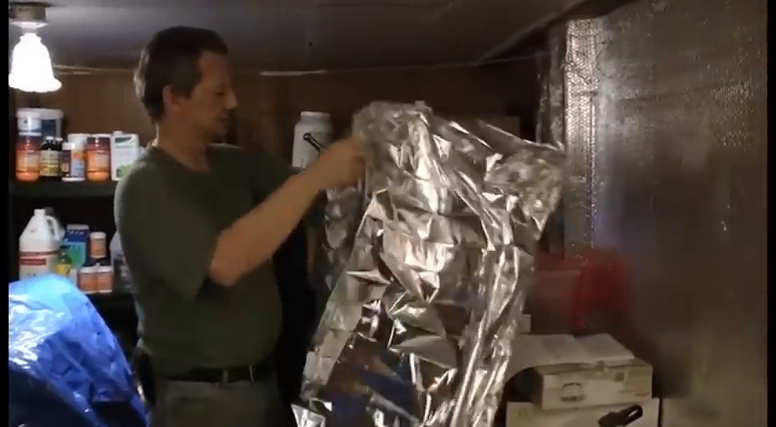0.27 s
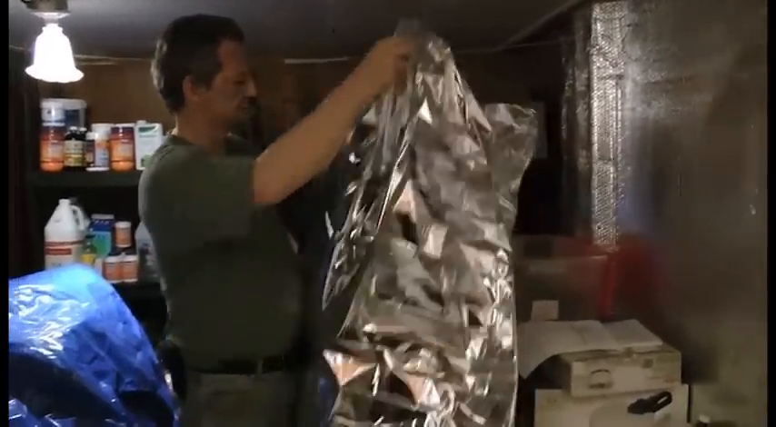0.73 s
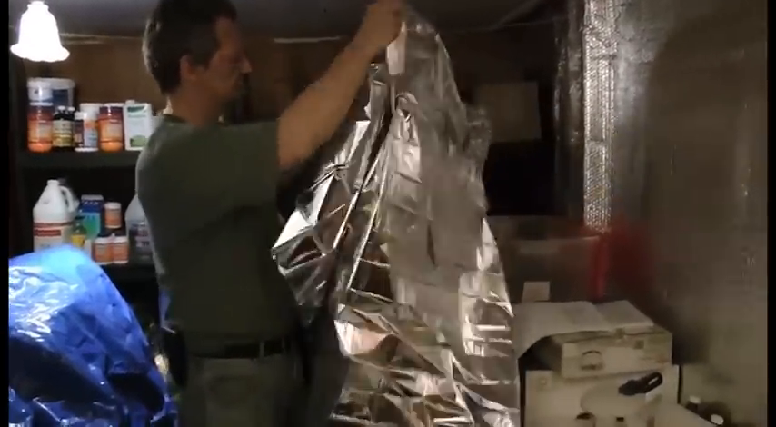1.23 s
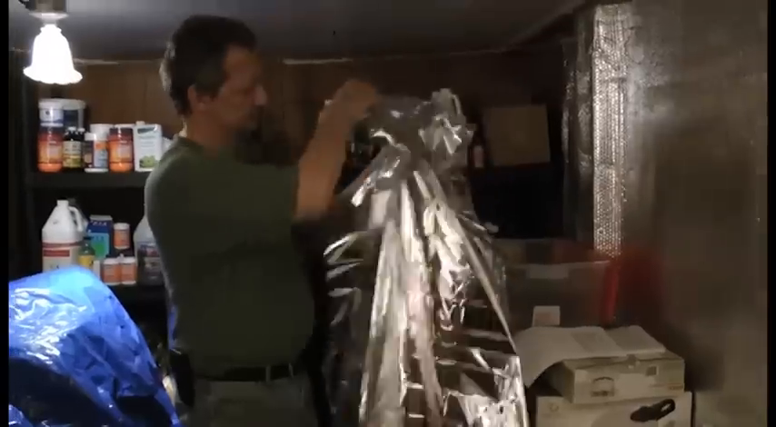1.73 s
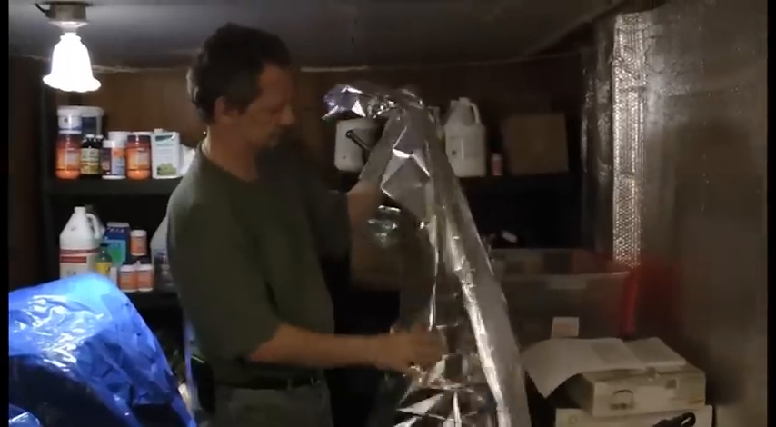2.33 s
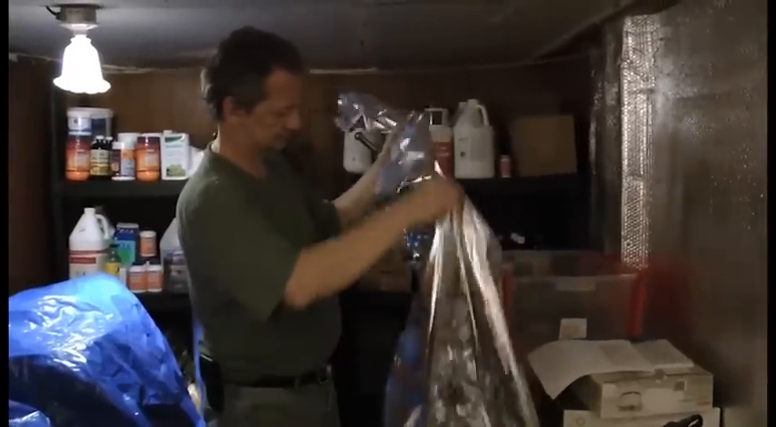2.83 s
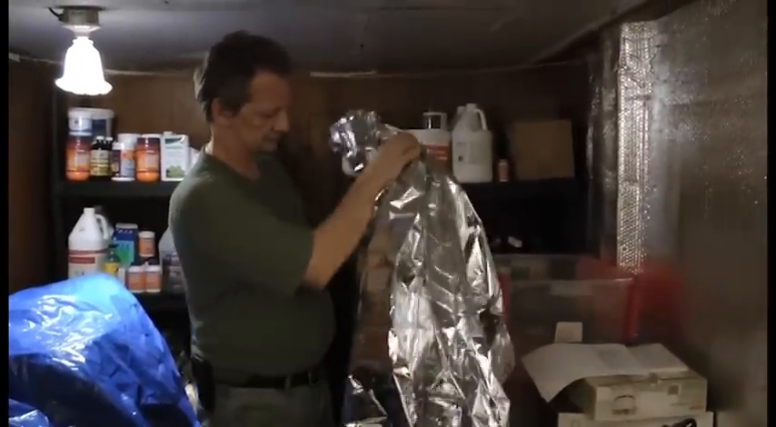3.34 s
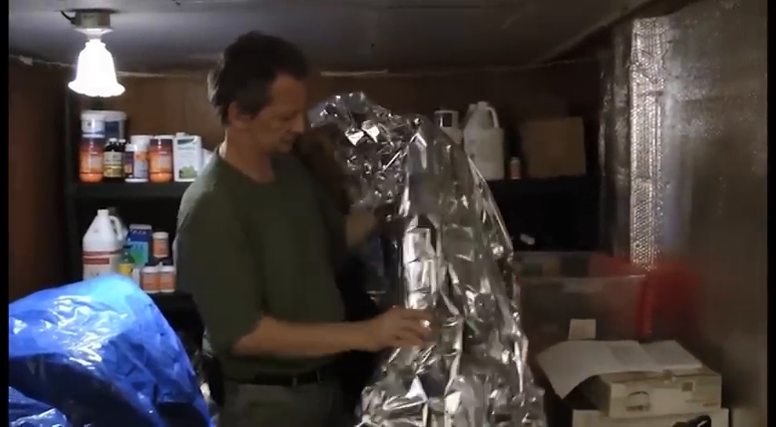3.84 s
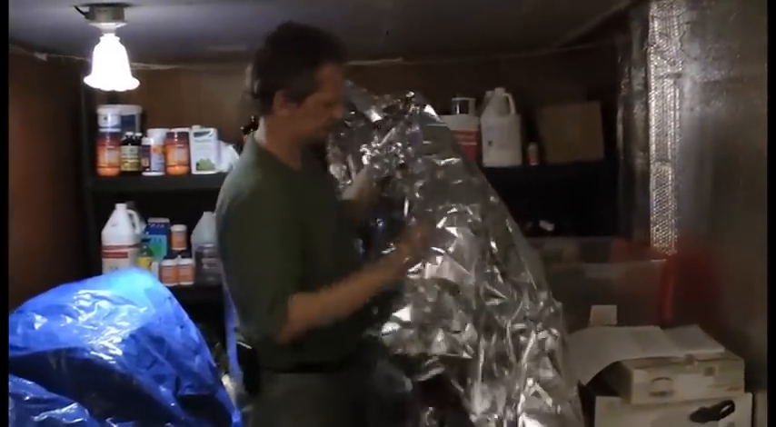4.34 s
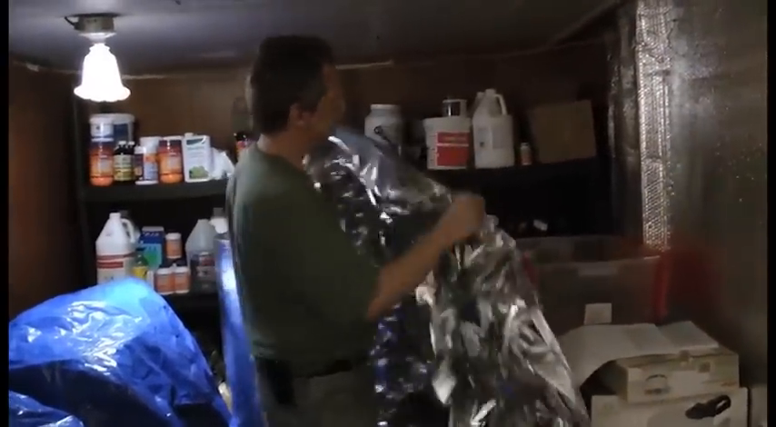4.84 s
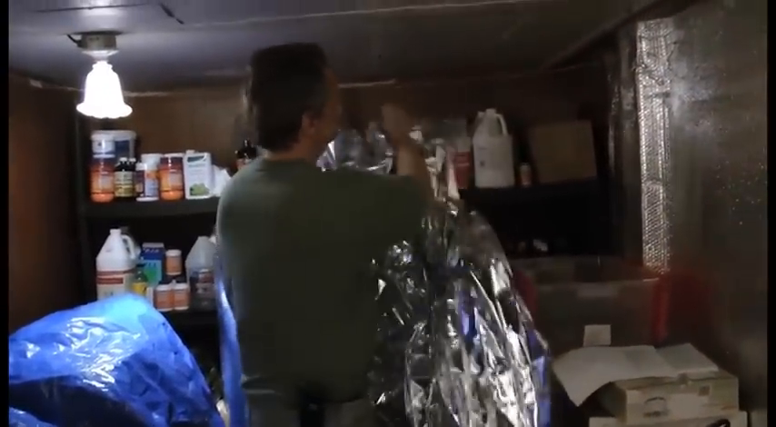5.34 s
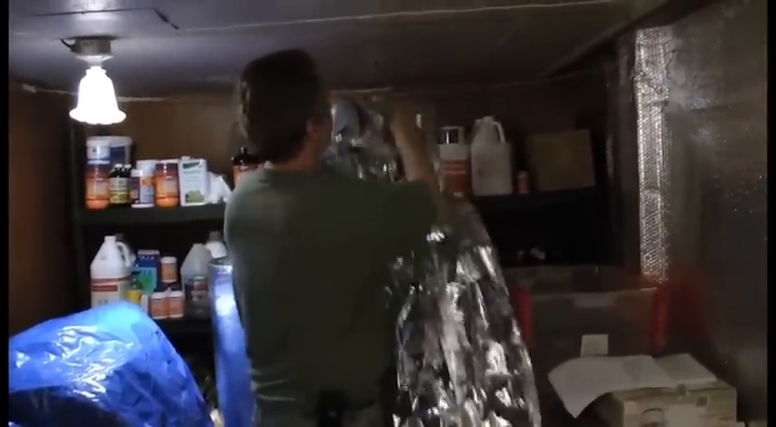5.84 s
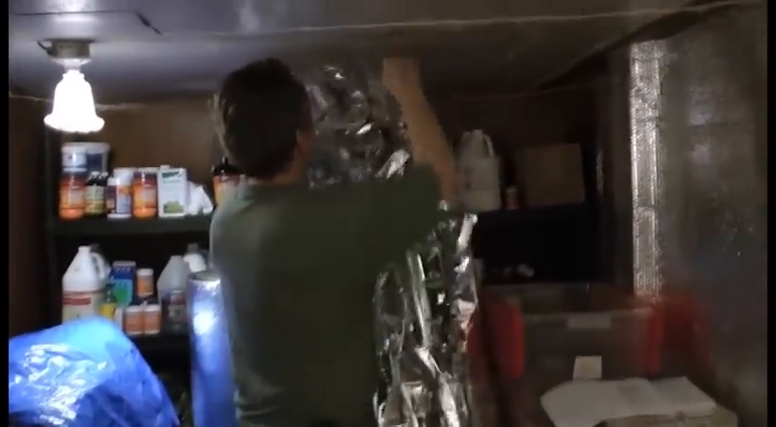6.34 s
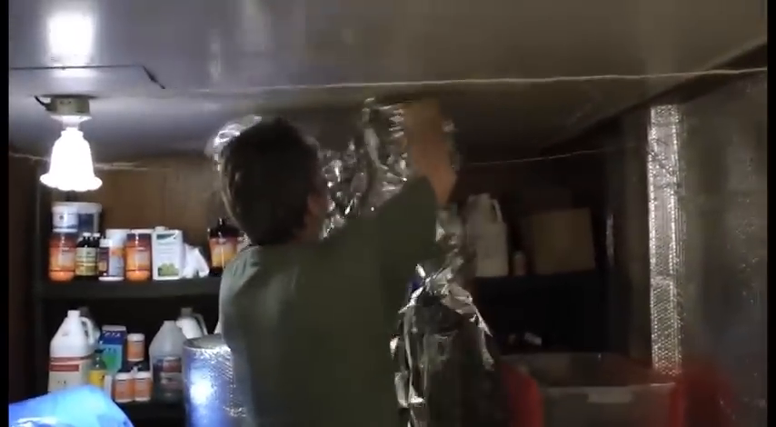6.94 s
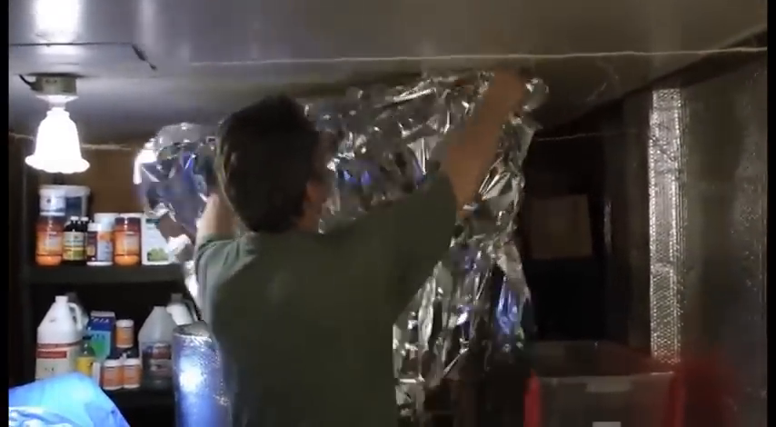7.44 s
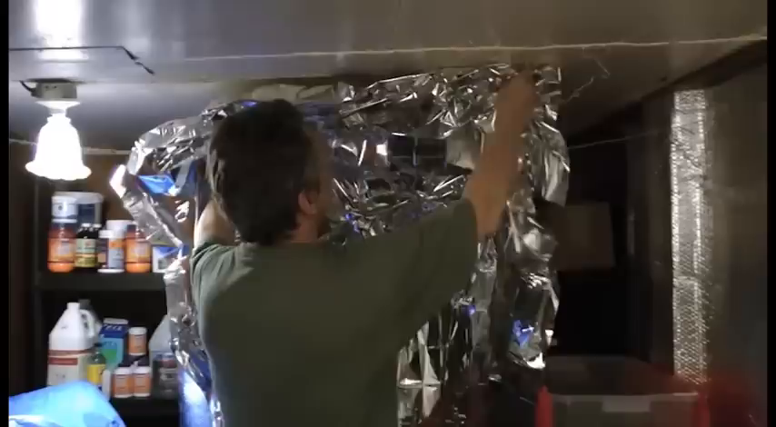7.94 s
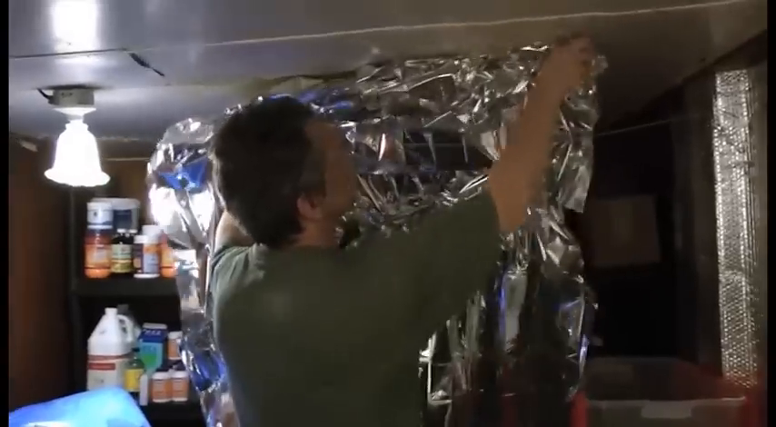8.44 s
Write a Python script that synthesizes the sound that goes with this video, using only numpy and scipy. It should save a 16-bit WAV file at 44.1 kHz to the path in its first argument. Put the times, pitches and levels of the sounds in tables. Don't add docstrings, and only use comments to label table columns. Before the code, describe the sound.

Foil film crinkles continuously, a few steps away indoors, with short dry room reflections and a faint appliance hum. Uneven strokes make dense, sizzling bursts, and the slack sheet flaps low underneath. A sharp tear-like jerk comes midway, then a cluster of woody thumps. After a quiet stretch with a brief low rub on the microphone body, louder rustling returns, fades and swells once more.

```python
import sys
import numpy as np
from scipy import signal
from scipy.fft import rfft, irfft, next_fast_len
from scipy.io import wavfile
from scipy.ndimage import uniform_filter1d, map_coordinates

SR = 44100
rng = np.random.default_rng(int(sys.argv[2]) if len(sys.argv) > 2 else 0)


def file_out(sig):
    cols = np.atleast_2d(sig).T
    lim = np.clip(cols, -1, 1)
    pcm = np.round(lim * 32767).astype(np.int16)
    wavfile.write(sys.argv[1], SR, pcm)


def amplitude_ratio(level_db):
    exponent = np.asarray(level_db, float) / 20
    return 10 ** exponent


N = 383229

# f/Hz, density/dB per Hz
AIR_SPECTRUM = [(15, -52), (48, -25), (70, -4), (140, -9), (200, -6.5), (300, -9), (420, -8), (700, -27.5)]
# f/Hz, level/dB rms
HUM_LINES = [
    (115.6, -61.5),
    (174, -64.5),
    (388, -64.5),
]
# t/s, level/dB
GRIP_LEVEL = [
    (6.29, -64),
    (6.328, -52),
    (6.426, -46),
    (6.486, -50),
    (6.61, -62),
    (6.64, -68),
]
# f/Hz, density/dB per Hz
RUB_SPECTRUM = [(12, -16), (25, -2), (80, 0), (130, -9), (250, -40), (500, -120)]
# t/s, peak/dB, f/Hz, t60/s
FLOOR_KNOCKS = [(1.39, -45, 400, .06), (1.64, -37, 219, .07), (1.65, -45, 125, .1), (2.31, -39, 340, .09),
                (2.92, -49, 40, .1), (3.752, -42, 242, .045), (4.469, -28.5, 322, .05),
                (4.47, -49.5, 45, .09), (4.987, -25, 340, .037), (4.995, -33.5, 65, .2),
                (5.004, -19.5, 340, 0.029), (5.012, -24.5, 172, .06), (5.024, -24, 170, .05),
                (5.032, -27, 290, .035), (5.042, -31, 115, .11), (5.052, -36, 340, .045),
                (5.063, -32, 188, .08), (5.085, -40, 151, .07), (6.405, -41, 85, .1),
                (6.478, -38, 105, 0.087), (6.885, -39, 340, 0.12), (6.995, -37, 135, .14),
                (7.002, -35, 240, .055), (6.993, -36, 420, .03), (7.782, -39, 112, .2),
                (7.815, -42, 108, .2)]
# f/Hz, t60/s
ROOM_T60 = [(200, 0.22), (2000, .3), (6000, .25), (14000, .15)]
# t/s, level/dB rms, t60/s
SNAP_BURSTS = [
    (1.579, -27, .03),
    (1.645, -22, .15),
    (4.473, -19, .06),
    (5.845, -32, .015),
    (6.115, -35, .015),
    (6.15, -35, .015),
    (6.405, -34, .02),
]
# t/s, level/dB, slack of the sheet/dB
HANDLING = [(0.0, -27.5, -1), (0.5, -25, -1.3), (1.0, -28, -1), (1.5, -26.5, -1.2), (2.2, -24.5, -0.3),
            (2.8, -21.0, -1.2), (3.35, -22.5, 1), (3.7, -27.5, 0.3), (4.4, -25.5, -0.7), (5.0, -22, -0.5),
            (5.6, -24.0, 1.5), (6.05, -32.5, 0.7), (6.68, -35.5, 0.3), (6.82, -25.5, 1.0), (7.4, -21, 0),
            (7.9, -33.5, 1.9), (8.43, -34.5, 1), (8.69, -26.5, 0.5)]
# peak t/s, level/dB rms, rise/s, fall/s
HAND_STROKES = [(0.071, -23.5, 0.037, 0.165), (0.281, -24.5, 0.036, 0.14), (1.264, -28.0, 0.028, 0.028),
                (1.427, -24, 0.11, 0.091), (1.595, -21.5, 0.021, 0.084), (1.652, -23, 0.012, 0.15),
                (2.023, -23.5, 0.14, 0.045), (2.376, -22.0, 0.033, 0.112), (2.568, -23.5, 0.037, 0.22),
                (2.777, -24, 0.039, 0.14), (3.322, -25, 0.11, 0.029), (3.456, -26, 0.11, 0.012),
                (3.767, -27, 0.024, 0.068), (3.865, -24, 0.0091, 0.093), (4.205, -21.5, 0.12, 0.088),
                (4.476, -19.5, 0.004, 0.099), (4.603, -23.5, 0.059, 0.045), (5.279, -27, 0.087, 0.13),
                (5.557, -30, 0.033, 0.023), (5.88, -33, 0.022, 0.11), (6.139, -35.5, 0.04, 0.03),
                (6.439, -35.0, 0.111, 0.18), (6.725, -31, 0.023, 0.05), (6.868, -25.5, 0.029, 0.04),
                (7.451, -26, 0.065, 0.017), (7.562, -26.5, 0.018, 0.259), (7.897, -26.5, 0.07, 0.086),
                (8.138, -25.5, 0.068, 0.23), (8.545, -26, 0.035, 0.073), (8.676, -30, 0.014, 0.021)]
# f/Hz, density/dB per Hz
SNAP_SPECTRUM = [(940, -42), (1600, -11), (1950, -5), (5970, -1), (9000, -5), (10300, -6.5), (12100, -10),
                 (15700, -12)]
# f/Hz, density/dB per Hz
SHEET_SPECTRUM = [(100, -19), (200, -7.5), (400, -5), (600, -2.5), (1000, -4), (1500, -0.5), (1800, -6.5),
                  (2400, -48)]
# f/Hz, width/Hz, level/dB
BODY_MODES = [(340, 220, -4.5), (388.6, 16, 5.5), (244, 25, -5), (732, 71, -0.5), (1420, 120, -4.5)]
# f/Hz, side minus mid/dB
PORT_DIFFERENCE = [(30, -5), (80, -9.5), (180, -9.5), (350, -11.5), (700, -8.5), (2400, -10), (6000, -12.5),
                   (9000, -9.5)]
# t/s, low f/Hz, high f/Hz
WIDE_MOMENTS = [
    (.66, 9200, 10400),
    (.66, 12300, 14500),
    (1.68, 13700, 15700),
    (2.92, 9500, 11800),
    (3.66, 14400, 15700),
    (4.15, 12300, 14500),
    (5.49, 11000, 12500),
]
# f/Hz, width/Hz, share
BODY_NOTCHES = [(494, 47, 0.48), (925, 67, .25), (1194, 13, 0.1), (1320, 40, 0.39), (1565, 70, 0.65)]
# f/Hz, left minus right/dB
PORT_LEAN = [(30, -2), (110, -3.5), (200, -1), (380, -1), (900, 0)]

AIR_DB = -52.5
TOP_HZ, STEREO_HZ = 15740, 9110
WIDE_MOMENT_S, WIDE_MOMENT_DB = 0.052, -0.5
BIGGEST_SNAP = 4.0
KNOCK_RISE_SHARE = 0.042
CREASE_DB = -2.5
WIDE_DB, FINE_DB, BOOM_DB = -5, -2.66, -14.5
WIDE_PER_SLACK, FINE_PER_SLACK, BOOM_PER_SLACK = 0.93, 0.24, 1.8
WIDE_PER_STROKE, FINE_PER_STROKE = -0.069, 0.11
BOOM_LAG_S = 0.053


def unit(x):
    return x / np.sqrt(np.mean(x ** 2) + 1e-20)


def along(points, hz):
    f, v = np.transpose(points)
    return np.interp(np.log(hz + 1), np.log(f + 1), v)


def curves(rows, **ends):
    s, *cols = np.transpose(rows)
    return [np.interp(np.arange(N) / SR, s, c, **ends) for c in cols]


def wobble(rate_hz):
    knots = rng.standard_normal(int(N * 200 / SR) + 4)
    position = np.arange(N) * min(rate_hz, 200) / SR
    return 1.45 * map_coordinates(knots, [position], prefilter=False)


def filtered(x, response):
    m = next_fast_len(N + SR // 2)
    return irfft(rfft(x, m) * response(np.fft.rfftfreq(m, 1 / SR)), m)[..., :N]


def peak(hz, centre_hz, width_hz):
    return 1j * hz * width_hz / (centre_hz ** 2 - hz ** 2 + 1j * hz * width_hz)


def low(hz, edge_hz):
    return 1 / np.sqrt(1 + (hz / edge_hz) ** 8)


def high(hz, edge_hz):
    return np.sqrt(1 - low(hz, edge_hz) ** 2)


def snap_tone(hz):
    return amplitude_ratio(along(SNAP_SPECTRUM, hz))


def room(x):
    hz, t, z = signal.stft(rng.standard_normal((2, SR // 2)), SR, nperseg=256)
    decay = amplitude_ratio(-60 * t / along(ROOM_T60, hz)[:, None])
    tail = signal.istft(z * decay, SR, nperseg=256)[1]
    return signal.fftconvolve(x[None], tail / np.linalg.norm(tail[0]), axes=1)[:, :N]


def still_room():
    air = unit(filtered(rng.standard_normal((2, N)), lambda hz: amplitude_ratio(along(AIR_SPECTRUM, hz))))
    t = np.arange(N) / SR
    hum = np.zeros(N)
    for hz, db in HUM_LINES:
        level = amplitude_ratio(db + 4.5 + 1.4 * wobble(12))
        hum += level * np.sin(2 * np.pi * hz * t + 1.6 * wobble(6))
    return amplitude_ratio(AIR_DB) * air + hum


def rub():
    level_db, = curves(GRIP_LEVEL, left=-120, right=-120)
    noise = filtered(rng.standard_normal((2, N)), lambda hz: amplitude_ratio(along(RUB_SPECTRUM, hz)))
    return amplitude_ratio(level_db + 3.5) * unit(noise)


def knocks():
    out, t = np.zeros(N + SR), np.arange(SR // 2) / SR
    for s, db, hz, t60 in FLOOR_KNOCKS:
        swell = amplitude_ratio(-60 * t / t60) * (1 - np.exp(-t / (KNOCK_RISE_SHARE * t60)))
        out[round(s * SR):][:len(t)] += amplitude_ratio(db) * swell / swell.max() * np.sin(2 * np.pi * hz * t)
    direct = out[:N]
    return np.array([direct, np.zeros(N)]) + amplitude_ratio(-8.5) * room(direct)


def snaps(per_second, spread_db):
    popped = rng.random(N) < per_second / SR
    sign = np.sign(rng.standard_normal(N))
    size = np.minimum(rng.exponential(size=N), BIGGEST_SNAP)
    return unit(popped * sign * amplitude_ratio(spread_db * size))


def crackle(level_db, colour, per_second, spread_db, wet_db):
    pops = snaps(per_second, spread_db)
    blur = amplitude_ratio(wet_db) * rng.standard_normal(N)
    pair = np.array([unit(pops + blur), rng.standard_normal(N)])
    return amplitude_ratio(level_db) * unit(filtered(pair, colour))


def bursts():
    t = np.arange(N) / SR
    burst = sum(amplitude_ratio(db - 60 * np.abs(t - s) / t60) * (t > s) for s, db, t60 in SNAP_BURSTS)
    bright = lambda hz: snap_tone(hz) * np.sqrt(hz / 6000)
    return burst * crackle(0, bright, per_second=5000, spread_db=6.5, wet_db=-5)


def effort():
    t = np.arange(N) / SR
    steady_db, slack_db = curves(HANDLING)
    strokes = np.zeros(N)
    for s, db, rise_s, fall_s in HAND_STROKES:
        side_s = np.where(t < s, rise_s, fall_s)
        strokes += amplitude_ratio(db) ** 2 * np.exp(-((t - s) / side_s) ** 2)
    total_db = 10 * np.log10(amplitude_ratio(steady_db) ** 2 + strokes)
    return total_db, total_db - steady_db, slack_db


def foil():
    total_db, stroke_db, slack_db = effort()
    crease_db = total_db + CREASE_DB
    effort_db = crease_db + 0.094 * wobble(12) + 0.32 * wobble(45) + 0.43 * wobble(120)

    wide_db = effort_db + WIDE_DB + WIDE_PER_SLACK * slack_db + WIDE_PER_STROKE * stroke_db
    fine_db = effort_db + FINE_DB + FINE_PER_SLACK * slack_db + FINE_PER_STROKE * stroke_db
    fine_db = fine_db + 0.5 * wobble(11)
    boom_db = uniform_filter1d(crease_db, round(BOOM_LAG_S * SR)) + BOOM_DB + BOOM_PER_SLACK * slack_db

    wide_tone = lambda hz: snap_tone(hz) * low(hz, 3430)
    crease_tone = lambda hz: snap_tone(hz) * high(hz, 3730) * low(hz, 8000)
    fine_tone = lambda hz: snap_tone(hz) * high(hz, 8300)

    def boom_tone(hz):
        modes = sum(amplitude_ratio(db) * abs(peak(hz, c, w)) ** 2 for c, w, db in BODY_MODES)
        return amplitude_ratio(along(SHEET_SPECTRUM, hz)) * (1 + modes)

    wide = crackle(wide_db, wide_tone, per_second=2500, spread_db=1.6, wet_db=3.5)
    creases = crackle(effort_db, crease_tone, per_second=4000, spread_db=1.8, wet_db=6)
    fine = crackle(fine_db, fine_tone, per_second=6000, spread_db=1.6, wet_db=1.5)
    boom = crackle(boom_db, boom_tone, per_second=600, spread_db=2.0, wet_db=5)
    return wide + creases + fine + boom


def ports(pair):
    t = np.arange(N) / SR
    mid = filtered(pair[0], lambda hz: amplitude_ratio(2.26 * (hz > STEREO_HZ)))
    side = filtered(pair[1], lambda hz: amplitude_ratio(along(PORT_DIFFERENCE, hz)) * (hz < STEREO_HZ))
    for s, lo_hz, hi_hz in WIDE_MOMENTS:
        window = np.cos(np.pi * np.clip((t - s) / WIDE_MOMENT_S, -0.5, 0.5)) ** 2
        band = filtered(pair[1], lambda hz: (hz > lo_hz) & (hz < hi_hz))
        side = side + amplitude_ratio(WIDE_MOMENT_DB) * window * band
    return np.array([mid + side, mid - side])


def scene():
    return ports(still_room() + knocks() + bursts() + foil()) + rub()


def band_limit(x):
    return signal.sosfilt(signal.butter(12, 17080, fs=SR, output="sos"), x)


def record(dry):
    def response(hz):
        notches = 1 - sum(share * abs(peak(hz, c, w)) ** 2 for c, w, share in BODY_NOTCHES)
        lean_db = along(PORT_LEAN, hz) * (hz < STEREO_HZ / 10)
        return notches * amplitude_ratio(np.array([[0.5], [-0.5]]) * lean_db) * (hz < TOP_HZ)

    mix = filtered(dry, response)
    return band_limit(mix)


dry = scene()
out = record(dry)
file_out(out)
```